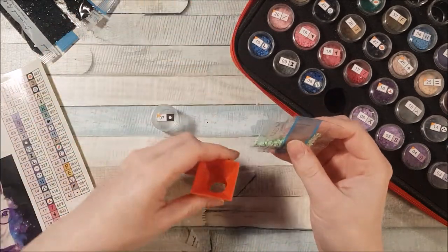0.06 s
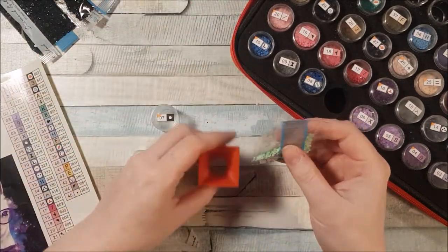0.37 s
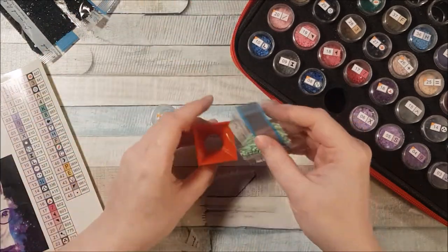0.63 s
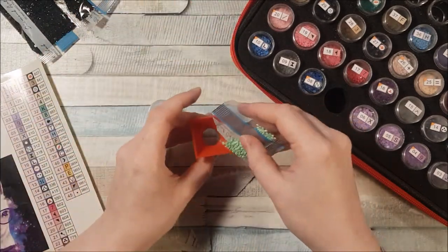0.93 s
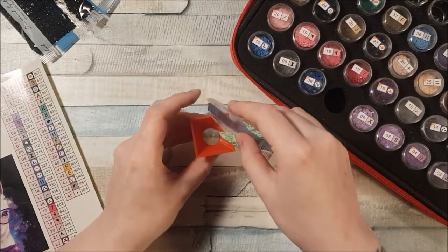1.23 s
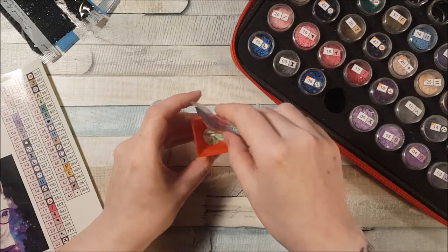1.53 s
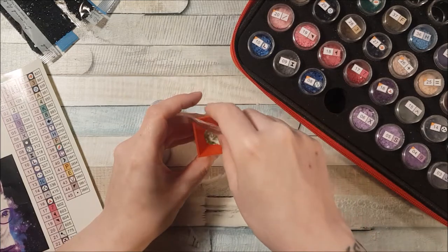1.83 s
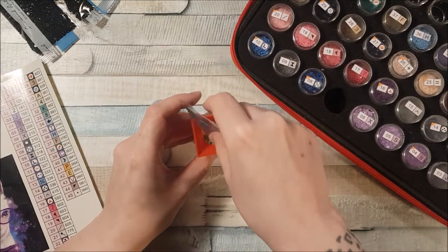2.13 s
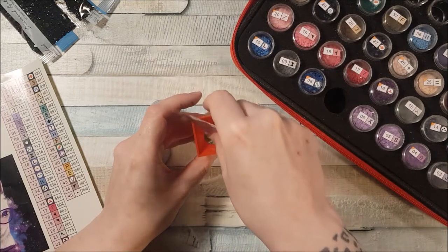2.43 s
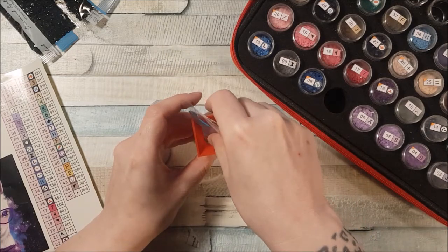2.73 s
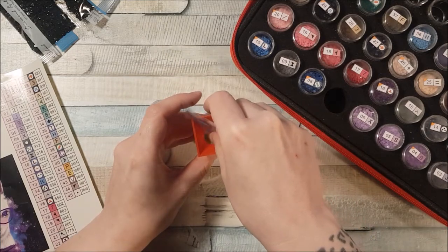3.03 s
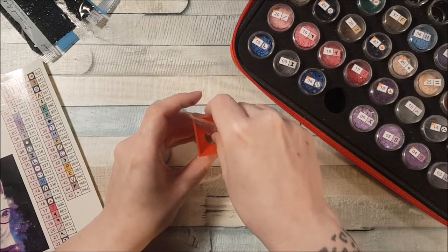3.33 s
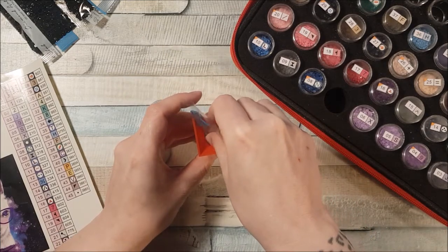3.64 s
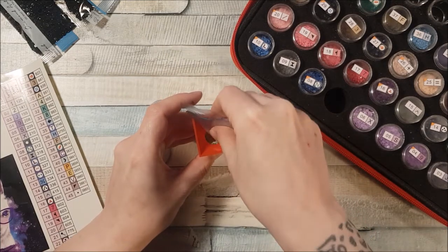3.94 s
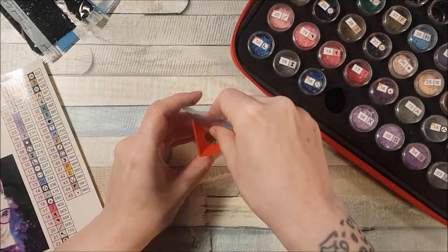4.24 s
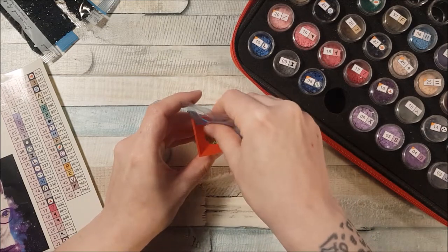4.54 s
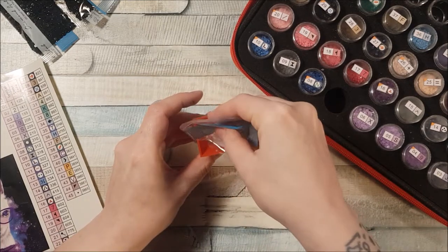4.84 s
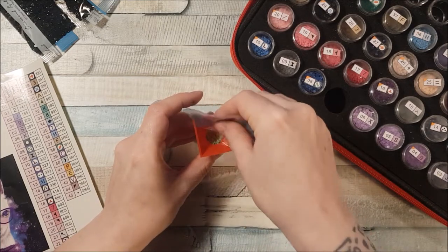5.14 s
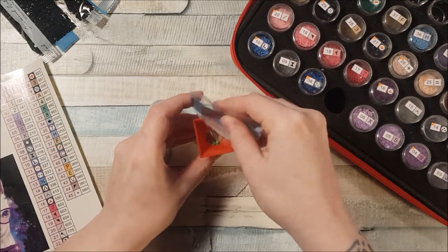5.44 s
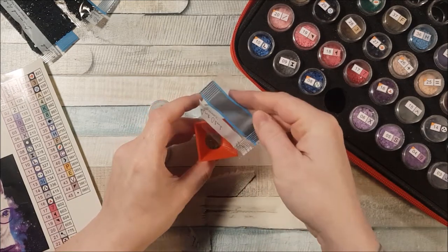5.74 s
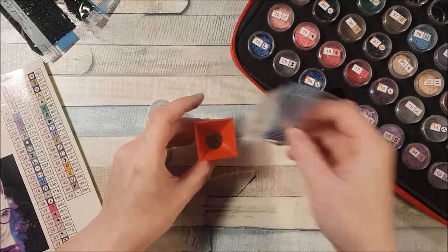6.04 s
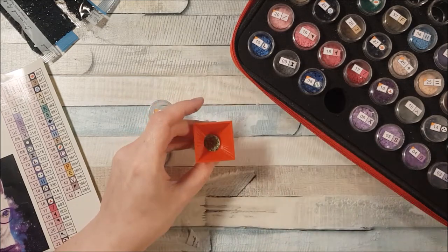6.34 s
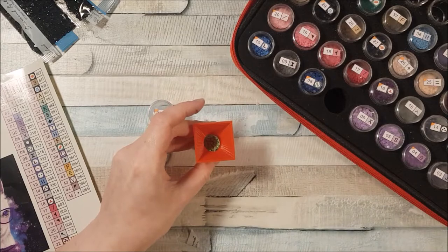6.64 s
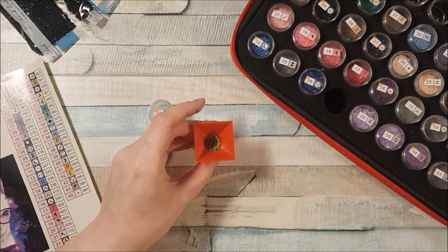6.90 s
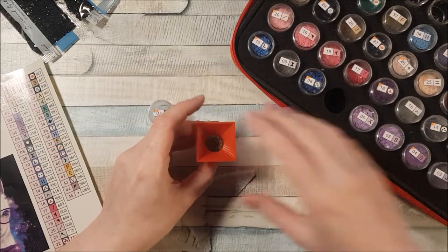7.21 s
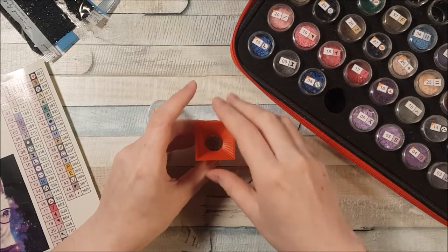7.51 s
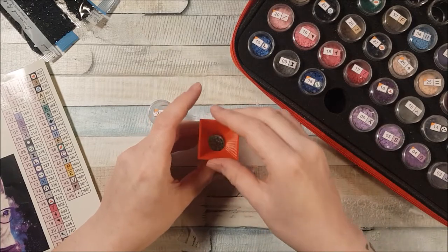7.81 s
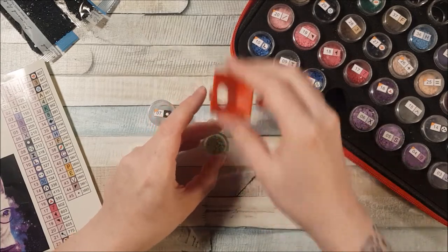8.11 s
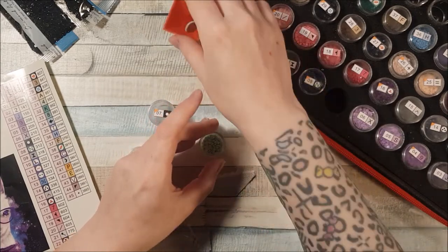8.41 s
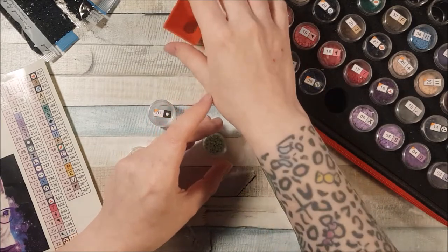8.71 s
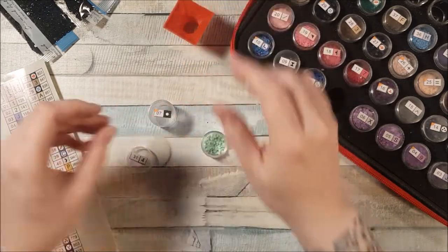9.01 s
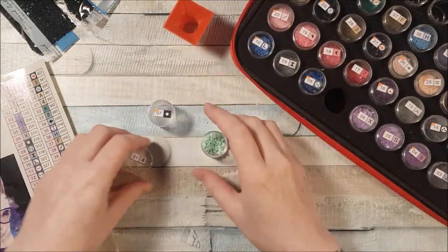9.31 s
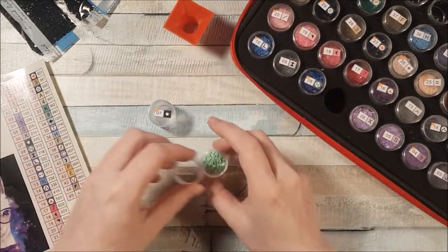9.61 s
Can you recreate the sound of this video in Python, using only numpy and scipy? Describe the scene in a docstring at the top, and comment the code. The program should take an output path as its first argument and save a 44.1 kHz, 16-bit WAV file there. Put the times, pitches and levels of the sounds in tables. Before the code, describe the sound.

A little jar knocks and scuffs on a table. Tiny resin beads hiss out of a small plastic bag, patter through a plastic funnel and ping on the jar's bottom. The bag crackles in bright snaps as the last beads are worked out, while the spout clacks on the rim. After a lull, the funnel is set down with a knock and hands thud softly. It is heard close up in a small room with a low hum.

```python
"""A small plastic bag crackles as tiny resin beads trickle through a plastic funnel into a little jar.
The jar knocks and scuffs into place on a table; beads hiss down the film, patter in the funnel and ping
on the jar's bare bottom. Fingers work the last ones out: the film buckles in bright snaps and the spout
clacks on the rim. The bag rustles aside, the funnel is twisted loose and set down, and hands thud onto
the table. A small room adds a short echo, and a low hum lies underneath."""
import sys
import numpy as np
from scipy import signal
from scipy.fft import rfft, irfft, next_fast_len
from scipy.io import wavfile
from scipy.ndimage import map_coordinates

SR = 44100
rng = np.random.default_rng(int(sys.argv[2]) if len(sys.argv) > 2 else 0)


def wav_out(sig):
    """Save sig, one row per channel (or a flat mono array), as 16-bit PCM at SR to the path in sys.argv[1]."""
    wavfile.write(sys.argv[1], SR, np.round(np.clip(np.atleast_2d(sig).T, -1, 1) * 32767).astype(np.int16))


N = 426006

# fingers squeeze the bag: t/s, length/s, level/dB, funnel shake relative to that level/dB
BAG_SQUEEZES = [(1.94, .15, -45, -3), (2.43, .19, -53, -1.5), (2.83, 0.054, -41.5, -4),
                (3.07, 0.044, -32.5, -4.5), (3.277, 0.046, -33, -8), (3.36, .05, -43.5, -6.5),
                (3.518, 0.068, -35.5, -10), (3.612, 0.029, -33.5, 1), (3.73, 0.098, -34, -8.5),
                (3.955, 0.11, -36.5, -9), (4.167, 0.074, -36, -7.5), (4.355, 0.11, -37, -5.5),
                (4.57, .105, -35, -4.5), (4.75, .1, -51, -23.5), (4.925, 0.052, -35, -14.5),
                (5.228, .045, -31, -12.5), (5.395, 0.059, -31.5, -12), (5.68, .025, -45, -7),
                (5.9, .05, -56, -4.5), (6.188, 0.037, -53.5, -11.5)]
# the bright tone of plastic film: f/Hz, level/dB
FILM_SPECTRUM = [(200, -59), (700, -31), (2000, -16), (3300, -3), (5000, -1.5), (7000, 1), (9000, -0.5),
                 (12000, 4), (15500, -1), (17000, -15)]
SQUEEZE_RISE = .14  # share of a squeeze spent building up
LEAD_S = .02  # time for a burst to swell before its peak


def amp(db):
    """Decibels to gain."""
    return 10 ** (np.asarray(db) / 20)


def unit(x):
    """Scaled to rms 1."""
    return x / np.sqrt(np.mean(np.abs(x) ** 2) + 1e-20)


def along(points, hz):
    """A curve through (f/Hz, value) points on a log frequency axis."""
    f, v = np.transpose(points)
    return np.interp(np.log(hz + 1), np.log(f + 1), v)


def faders(rows):
    """A gain curve for each dB column of timed rows, silent outside them."""
    times, *levels = np.transpose(rows)
    return [amp(np.interp(np.arange(N) / SR, times, db, left=-140, right=-140)) for db in levels]


def wobble(rate):
    """A smooth random curve, rate knots a second."""
    return map_coordinates(rng.standard_normal(int(N * rate / SR) + 4), [np.arange(N) * rate / SR])


def filtered(x, response):
    """x through a frequency response, scaled to keep the power of white noise."""
    n = x.shape[-1]
    size = next_fast_len(n + 8192)
    curve = unit(response(np.fft.rfftfreq(size, 1 / SR)))
    return irfft(rfft(x, size) * curve, size)[..., :n]


def colour(points):
    """The minimum-phase response with a given spectrum."""
    def response(f):
        cepstrum = irfft(np.log(amp(along(points, f))))
        cepstrum[1:len(f) - 1] *= 2
        cepstrum[len(f):] = 0
        return np.exp(rfft(cepstrum))
    return response


def body(modes):
    """The response of damped resonances of alternating polarity."""
    return lambda f: sum((-1) ** k * amp(db) * 1j * f * width / (hz * hz - f * f + 1j * f * width)
                         for k, (hz, width, db) in enumerate(modes))


def stereo(pair, side_db, pan_db):
    """Mid and side become left and right; positive pan leans left."""
    mid, side = pair[0], amp(side_db) * pair[1]
    left, right = (mid + side) * amp(pan_db / 2), (mid - side) * amp(-pan_db / 2)
    return np.array([left, right]) / np.hypot(1, amp(side_db))


def add(track, s, sound):
    """Mix a sound into a track from time s."""
    part = track[:, max(0, round(s * SR)):][:, :sound.shape[-1]]
    part += sound[:, :part.shape[-1]]


def burst(decay_s, rise_s):
    """Two channels of noise, each of energy 1, peaking LEAD_S after the start."""
    t = np.arange(round((LEAD_S + 6 * decay_s) * SR)) / SR - LEAD_S
    noise = rng.standard_normal((2, len(t))) * np.exp(-np.maximum(t / decay_s, -t / rise_s))
    return noise / np.linalg.norm(noise, axis=1, keepdims=True)


def grains(per_s, spread_db):
    """Random tiny impacts of uneven size, rms 1."""
    hit = rng.random(N) < per_s / SR
    size = amp(spread_db * np.minimum(rng.exponential(size=N), 4))
    return unit(hit * size * rng.standard_normal((2, N)))


def strokes(rows, rise, release_s):
    """Envelope of (t/s, length/s, level/dB) gestures: rise over a share of the length, hold, release."""
    out = np.zeros((1, N))
    for s, length, db in rows:
        t = np.arange(round((length + 10 * release_s) * SR)) / SR
        attack = np.minimum(t / (rise * length), 1)
        release = np.exp(-np.maximum(t - length, 0) / release_s)
        add(out, s, amp(db) * attack * release[None])
    return out[0]


def background(hum_hz=48.8, right_lag_rad=.45):
    """A faintly wavering hum over low rumble and a thin, high, steady hiss."""
    background_spectrum = [(20, -20), (40, -6.5), (62, -9.5), (80, -5.5), (110, -7), (150, -12.5),
                           (210, -25), (280, -19), (420, -28.5), (1000, -32), (2300, -33), (4500, -43.5),
                           (8500, -49), (11500, -33.5), (15800, -32.5)]  # low rumble and thin, high hiss: f/Hz, level/dB
    phase = 2 * np.pi * np.cumsum(hum_hz + .25 * wobble(4)) / SR
    hum = amp(-54.5 + .5 * wobble(7)) * np.sin([phase, phase - right_lag_rad]) * amp([[1.5], [-1.5]])
    bed = filtered(rng.standard_normal((2, N)), colour(background_spectrum))
    bed[1] -= .68 * signal.lfilter(*signal.butter(1, 1500, fs=SR), bed[1])  # narrow bass, wide treble
    return hum + amp(-60.5) * stereo(bed, side_db=2.5, pan_db=2)


def room_echo(x, side_db):
    """Near walls answer with a short noise tail, a fresh one for every 50 ms of sound."""
    decay_times = [(200, .24), (800, .18), (2000, .15), (5500, .13), (15000, .12)]  # the room's decay: f/Hz, t60/s
    out, step = np.zeros((2, N)), SR // 20
    starts = range(0, N, step)
    hz, t, noise = signal.stft(rng.standard_normal((len(starts), 2, SR // 5)), SR, nperseg=256)
    tails = signal.istft(noise * amp(-60 * t / along(decay_times, hz)[:, None]), SR, nperseg=256)[1]
    for start, tail in zip(starts, tails):
        tail = stereo(tail / np.linalg.norm(tail[0]), side_db, pan_db=.5)
        send = x[:, start:start + step].mean(0)[None]
        add(out, start / SR + .0015, signal.fftconvolve(send, tail, axes=1))
    return out


def hand_thumps(contact_s=.0045, sway_hz=52):
    """A soft push gives a dull thud and sways the whole table top; fingers rub just as dully."""
    pushes = [(4.582, -54, -55.5), (4.96, -59, -46), (9.326, -54, -47.5), (9.353, -42, -52.5),
              (9.388, -47, -50.5), (9.427, -62, -48.5)]  # hands and jar press on the table: t/s, sway/dB, thud/dB
    rubs = [(6.61, 0.026, -66.5), (6.76, .1, -62), (6.99, 0.032, -68), (7.48, 0.071, -70),
            (7.745, 0.02, -64)]  # fingers shift their grip on the jar: t/s, length/s, level/dB
    skin_spectrum = [(50, -4), (120, 4), (230, -4), (400, -1), (750, -6.5), (1200, -20.5), (2400, -22),
                     (5000, -34.5), (15000, -41)]  # the muffled tone of skin contact: f/Hz, level/dB
    sways, t = np.zeros((2, N)), np.arange(SR // 2) / SR
    thuds = strokes(rubs, rise=.39, release_s=.014) * rng.standard_normal((2, N))
    sway = np.sin(2 * np.pi * sway_hz * t) * (1 - np.exp(-t / .0067)) * amp(-60 * t / .3)
    for s, sway_db, thud_db in pushes:
        add(sways, s, amp(sway_db + 5.5) * sway * amp([[1.5], [-1.5]]))
        add(thuds, s - LEAD_S, amp(thud_db + 26.5) * burst(contact_s, rise_s=contact_s * .22))
    return sways, filtered(stereo(thuds, side_db=-5.5, pan_db=4), colour(skin_spectrum))


def table_knocks(click_db=-21.5, click_hz=2600):
    """Jar and funnel knock on the table: one push and a little chatter; softer contact is duller."""
    knocks = [(0.218, -43.5, .0008, 4500), (0.2403, -35.5, 0.0015, 8800), (0.261, -33, 0.0013, 7000),
              (0.283, -39.5, .0012, 3460), (8.5005, -28.5, .0012, 3120), (8.648, -47.5, 0.0058, 1270),
              (8.6757, -40, 0.0014, 1970)]  # hard contacts: t/s, level/dB, chatter decay/s, treble corner/Hz
    table_modes = [(300, 80, -15), (430, 55, -4), (640, 80, 0), (880, 130, .5), (1100, 160, -1.5),
                   (1350, 140, -1), (1600, 120, -1), (1820, 140, -3.5), (2230, 240, -4), (2700, 250, -9),
                   (3900, 900, -23)]  # the table top's ring: f/Hz, width/Hz, level/dB
    out = np.zeros((2, N))
    click = lambda f: amp(click_db) * f / (f - 1j * click_hz)
    for s, db, decay_s, bright_hz in knocks:
        blow = np.pad(burst(decay_s, rise_s=decay_s * .4), ((0, 0), (0, SR // 10)))
        blow[0, round(LEAD_S * SR)] += 1.6  # the push
        blow = stereo(blow, side_db=-7, pan_db=1.5)
        contact = lambda f: f / (f - 200j) / (1 + 1j * f / bright_hz) ** 3
        ring = filtered(blow, lambda f: (body(table_modes)(f) + click(f)) * contact(f))
        add(out, s - LEAD_S, amp(db + 23) * ring / np.linalg.norm(ring[0]))
    return out


def plastic_scuffs(soft_hz=4750):
    """Plastic sticks and slips: the jar's foot on the table, later the spout in the jar."""
    judders = [(.346, 0.03, -29)]  # the jar is pushed into place: t/s, length/s, level/dB
    twists = [(7.74, 0.0346, -63.5), (7.945, 0.031, -53.5)]  # the funnel is twisted loose: t/s, length/s, level/dB
    foot_modes = [(480, 160, -8), (740, 200, -4), (1020, 260, 0), (1370, 220, -3), (1920, 240, -8),
                  (2300, 300, -12), (3600, 600, -24)]  # the jar's foot resonates: f/Hz, width/Hz, level/dB
    spout_modes = [(738, 300, 1.5), (1030, 340, 4), (2110, 500, -1), (3740, 310, -2.5), (4500, 500, -12.5),
                   (13060, 3200, -16)]  # the spout resonates: f/Hz, width/Hz, level/dB
    slips = stereo(grains(per_s=5000, spread_db=.5), side_db=-7, pan_db=2)
    foot_tone = lambda f: body(foot_modes)(f) * (f / (f - 300j)) ** 2 / (1 + 1j * f / soft_hz) ** 5
    foot = strokes(judders, rise=.393, release_s=.026) * filtered(slips, foot_tone)
    spout = strokes(twists, rise=.34, release_s=.011) * filtered(slips, body(spout_modes))
    return foot + spout


def rim_clacks():
    """Stiff plastic on plastic: a very short, hollow crack."""
    clacks = [(3.364, -36.5), (3.625, -34), (4.0416, -30.5), (4.4565, -28), (4.792, -19.5), (4.96, -29.5),
              (5.258, -28.5), (5.7472, -54)]  # the spout hits the jar's rim: t/s, level/dB
    rim_modes = [(2750, 550, 1), (3600, 700, -1), (5300, 900, -8)]  # the rim's ring: f/Hz, width/Hz, level/dB
    blows = np.zeros((2, N))
    for s, db in clacks:
        add(blows, s - LEAD_S, amp(db + 21) * burst(decay_s=.0006, rise_s=.0002))
    return filtered(stereo(blows, side_db=-7.5, pan_db=-3), body(rim_modes))


def bead_pings(flight_s=.0043, loss_db=5.5, cover_s=.094):
    """Beads drop into the jar and bounce, ringing its hard bottom until they cover it."""
    drops = [(1.2996, -23), (1.3516, -17), (1.3808, -25), (1.4564, -17), (1.4706, -17), (1.4927, -21),
             (1.5893, -18.5), (1.6215, -24.5), (1.657, -25)]  # the hardest strikes on the bare bottom: t/s, level/dB
    pour = [(1.3, 0.54, -41.5)]  # the mass of beads showers in: t/s, length/s, level/dB
    jar_modes = [(8600, 330, -4), (15620, 340, -.5)]  # the bottom's high ring: f/Hz, width/Hz, level/dB
    blows = np.zeros((2, N))
    for s, db in drops:
        flights = flight_s * rng.uniform(.3, 1.7, size=3)
        sizes = amp(db + 12 - loss_db * np.array([0, 2, 3, 4]))  # a strike and three bounces
        for when, size in zip(s + np.cumsum([0, *flights]), sizes):
            add(blows, when, size * np.array([[1], [rng.uniform(-1, 1)]]))
    shower = strokes(pour, rise=.19, release_s=cover_s) * grains(per_s=500, spread_db=3)
    return filtered(stereo(blows + shower, side_db=-1, pan_db=-2), body(jar_modes))


def bag_rustle(low_cut_hz=3500):
    """A light brush on the film leaves out its low notes."""
    brushes = [(.255, 0.04, -61), (.348, 0.055, -59.5), (.518, 0.013, -53.5), (1.075, .008, -47),
               (6.19, 0.23, -63.5), (6.37, 0.023, -55), (6.745, 0.08, -50.5), (6.985, 0.033, -58)]  # the bag grazes fingers, later settles empty: t/s, length/s, level/dB
    friction = stereo(grains(per_s=1500, spread_db=-4), side_db=0, pan_db=-.5)
    thin_film = lambda f: colour(FILM_SPECTRUM)(f) * f / (f - 1j * low_cut_hz)
    return strokes(brushes, rise=.31, release_s=.022) * filtered(friction, thin_film)


def bead_stream():
    """Beads hiss down the rustling bag and patter on the funnel's walls, stirring the air in its cone."""
    flow = [(.52, -66.5, -63), (.6, -54.5, -73), (.71, -44, -61.5), (.98, -53.5, -64), (1.22, -49, -65.5),
            (1.4, -51, -60), (1.54, -42.5, -59.5), (2.05, -46, -59), (2.33, -51, -59), (2.53, -48, -61.5),
            (2.98, -52.5, -60.5), (3.23, -48, -58), (3.48, -57.5, -63.5), (4.7, -65, -63.5),
            (5.35, -50.5, -67), (5.56, -71, -79), (6.1, -74.5, -77.5)]  # the run of beads: t/s, hiss/dB, patter/dB
    slide_spectrum = [(300, -36.5), (1600, -16), (3300, -1), (4500, -1.5), (6500, 0), (8300, -1.5),
                      (10000, 0), (12500, 1.5), (16000, -2.5)]  # beads rubbing on film: f/Hz, level/dB
    cone_modes = [(1295, 260, 2), (2030, 480, 2), (3150, 660, 0.5)]  # the air in the cone: f/Hz, width/Hz, level/dB (each before squaring)
    hiss, patter = faders(flow)
    # every squeeze shakes some beads loose, which run on
    spill = amp(-15.5) * strokes([row[:3] for row in BAG_SQUEEZES], SQUEEZE_RISE, release_s=.017)
    rubs = stereo(grains(per_s=5000, spread_db=2), side_db=0, pan_db=-2)
    slide = np.hypot(hiss, spill) * filtered(rubs, colour(slide_spectrum))
    rustle = bag_rustle()
    taps = stereo(grains(per_s=320, spread_db=2), side_db=-5.5, pan_db=-1)
    # squared resonances leave deep valleys between them: a hollow tone
    cone = filtered(taps, lambda f: sum(body([mode])(f) ** 2 for mode in cone_modes))
    return slide + rustle, np.hypot(patter, amp(-3) * spill) * cone


def crinkles(per_s=140, decay_s=.0024, spread_db=4):
    """Creases give way one after another at uneven intervals, each a tiny burst; rms 1."""
    late, size = rng.random(4096), rng.standard_normal(4096)
    onsets = ((np.arange(len(late)) + 2 * late) * SR / per_s).astype(int)
    kicks = np.bincount(onsets, amp(spread_db * np.clip(size, -2, 2)), minlength=N)[:N]
    envelope = signal.lfilter([1], [1, -np.exp(-1 / (decay_s * SR))], kicks)
    return unit(envelope * rng.standard_normal((2, N)))


def bag_crackle(strain_s=.011, strain_db=-16):
    """Squeezes crinkle the film, big buckles snap brightly, and both shake the funnel under the bag."""
    buckles = [(.615, -37.5, -7), (1.524, -33.5, -7.5), (1.679, -28, -15), (1.8263, -37.5, -5),
               (2.0808, -28.5, -3.5), (2.2169, -30, -7.5), (2.326, -35, -3.5), (2.5133, -35.5, -2.5),
               (2.7066, -32.5, -11.5), (2.741, -29, -7.5), (2.846, -31.5, -8), (2.897, -33, -3.5),
               (3.04, -32.5, -12), (3.0764, -35, -3.5), (3.1032, -31, -5.5), (3.303, -29, -11.5),
               (3.349, -33.5, -10), (3.3642, -24.5, -12), (3.41, -29.5, -9.5), (3.4836, -40, -2),
               (3.556, -26, -16), (3.622, -28.5, -8), (3.7216, -25, -4), (3.7911, -26.5, -10),
               (3.8083, -25, -16), (3.9258, -26.5, -10), (3.983, -22.5, -7.5), (4.023, -30, -6),
               (4.0432, -23, -17.5), (4.175, -32, -9.5), (4.2742, -24, -14), (4.333, -38.5, -16),
               (4.422, -23.5, -5.5), (4.4547, -26, -0.5), (4.474, -21.5, -17), (4.54, -30.5, -25),
               (4.5811, -17, -14), (4.625, -24.5, -12.5), (4.755, -32.5, 3.5), (4.7917, -22.5, -4),
               (4.875, -26, -4), (4.9466, -28, -20), (4.961, -19, -3.5), (5.0486, -35.5, -6),
               (5.147, -35.5, -11.5), (5.2428, -23, -10), (5.2574, -22, -15), (5.402, -22.5, -15),
               (5.4827, -32, -3.5), (5.6322, -39, -15), (5.6873, -38.5, -38), (5.7468, -29.5, -11),
               (5.876, -53.5, -1), (5.9551, -32.5, -15), (6.007, -51.5, 2.5), (6.3854, -37, -8)]  # the loudest snaps: t/s, level/dB, funnel shake relative to that level/dB
    funnel_modes = [(455, 140, -9.5), (600, 92, -1.5), (804.6, 330, -5), (1227, 160, 4.5), (2066, 180, 3.5),
                    (2640, 200, -2.5), (3430, 410, 1.5), (4028, 1700, -4.5)]  # the shaken funnel: f/Hz, width/Hz, level/dB
    creases = crinkles()
    # the film ticks faintly just before it buckles
    strains = [(s - strain_s, strain_s, db + strain_db, shake_db) for s, db, shake_db in buckles]
    presses = BAG_SQUEEZES + strains
    on_film = [(s, length, db) for s, length, db, _ in presses]
    on_funnel = [(s, length, db + shake_db) for s, length, db, shake_db in presses]
    film = creases * strokes(on_film, SQUEEZE_RISE, release_s=.007)
    shake = creases * strokes(on_funnel, SQUEEZE_RISE, release_s=.007)
    for s, db, shake_db in buckles:
        decay_s = .0008 * amp(.55 * (db + 30.5))  # bigger buckles take longer
        snap = amp(db + 23) * burst(decay_s, rise_s=decay_s * .43)
        add(film, s - LEAD_S, snap)
        add(shake, s - LEAD_S, snap * amp(shake_db))
    bright = filtered(stereo(film, side_db=-1, pan_db=-1.5), colour(FILM_SPECTRUM))
    hollow = amp(-2) * filtered(stereo(shake, side_db=-6, pan_db=3), body(funnel_modes))
    return bright, hollow


def scene():
    """Bag, funnel, jar and table, close up in a small room; the bright sounds get the widest echo."""
    crackle, shake = bag_crackle()
    slide, patter = bead_stream()
    sways, thuds = hand_thumps()
    bright = crackle + slide + bead_pings() + rim_clacks()
    hollow = shake + patter + plastic_scuffs()
    table = table_knocks() + thuds
    echo = amp(-3.5) * room_echo(bright, side_db=-1) + room_echo(amp(-5) * hollow + table, side_db=-8)
    return bright + hollow + table + sways + echo + background()


def record(dry):
    """A brick-wall low-pass takes off the very top."""
    top_hz = 16050
    return irfft(rfft(dry) * (np.fft.rfftfreq(N, 1 / SR) < top_hz), N)


dry = scene()
out = record(dry)
wav_out(out)
```